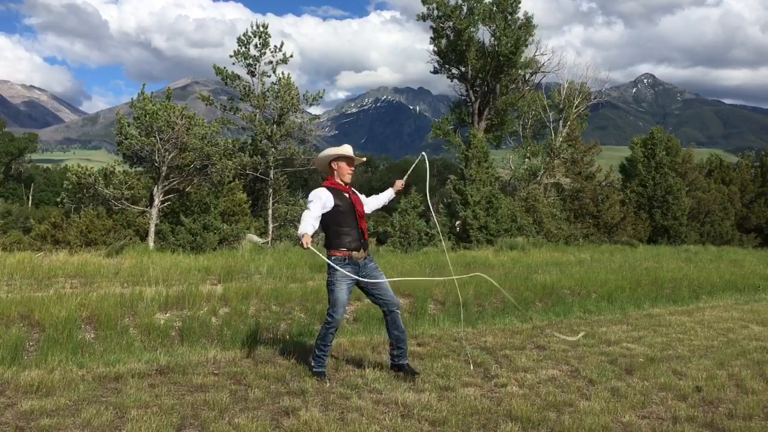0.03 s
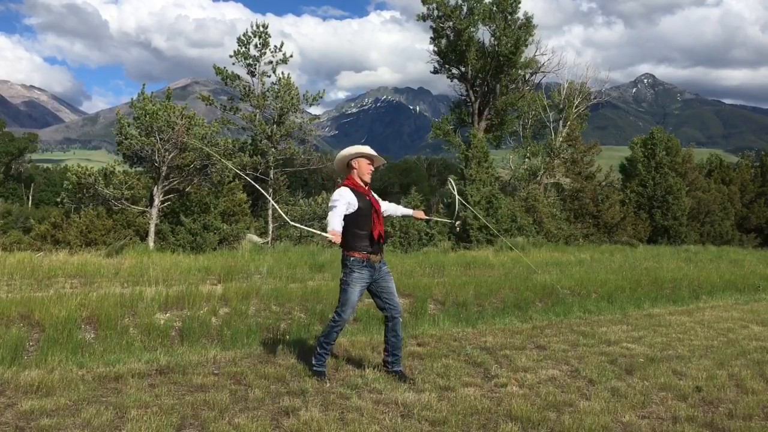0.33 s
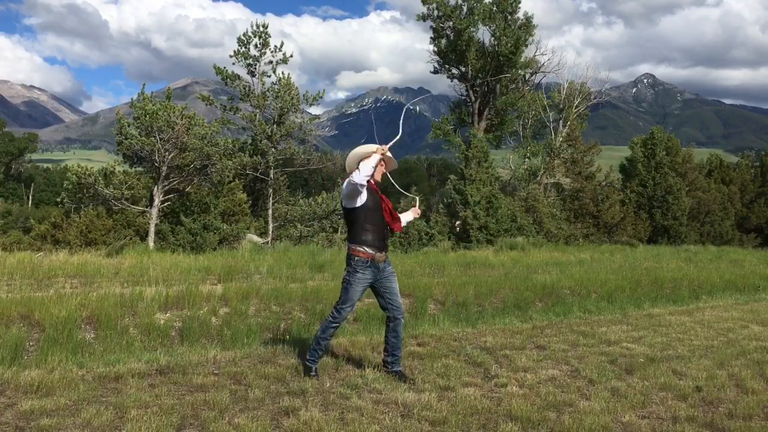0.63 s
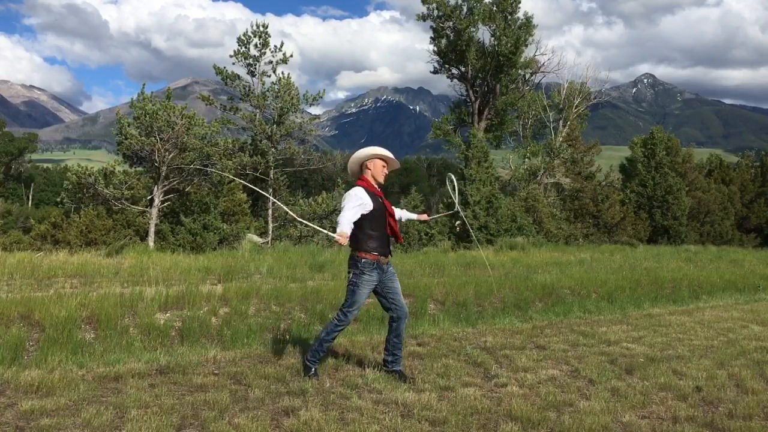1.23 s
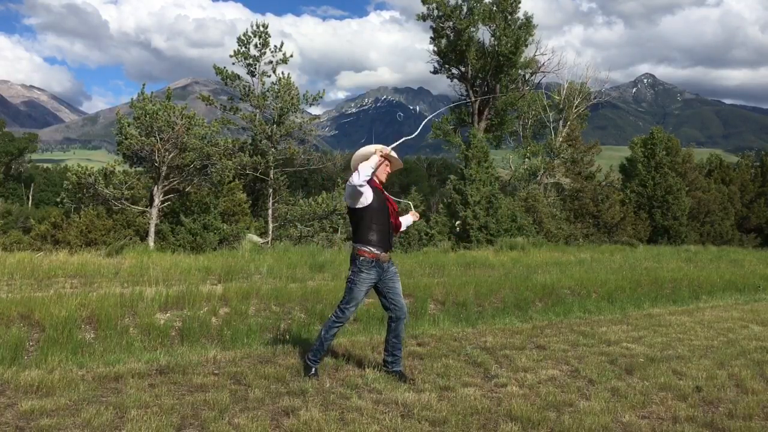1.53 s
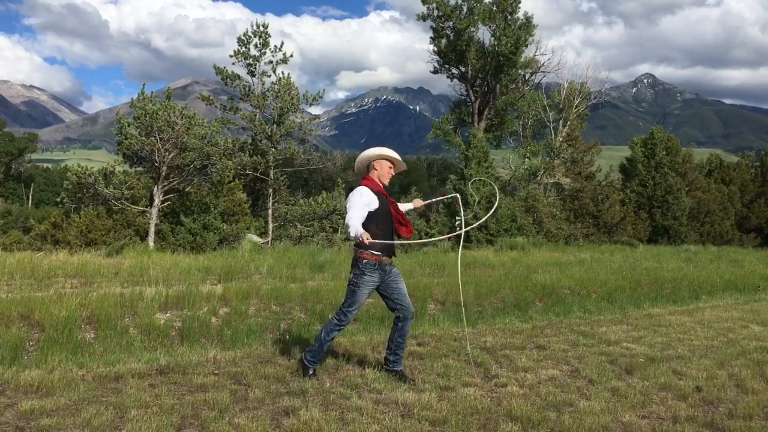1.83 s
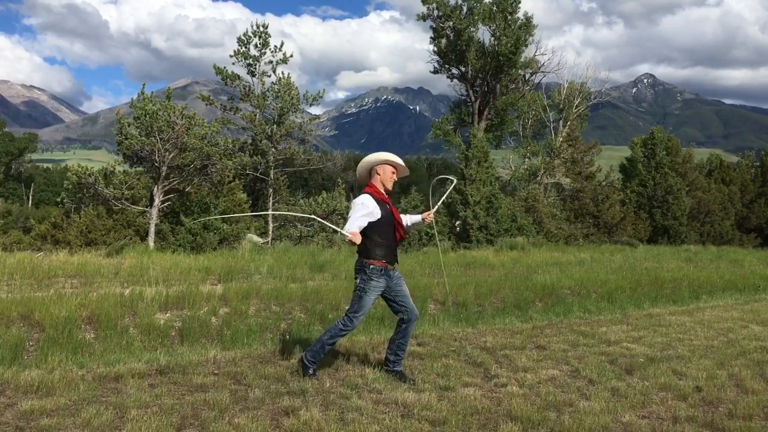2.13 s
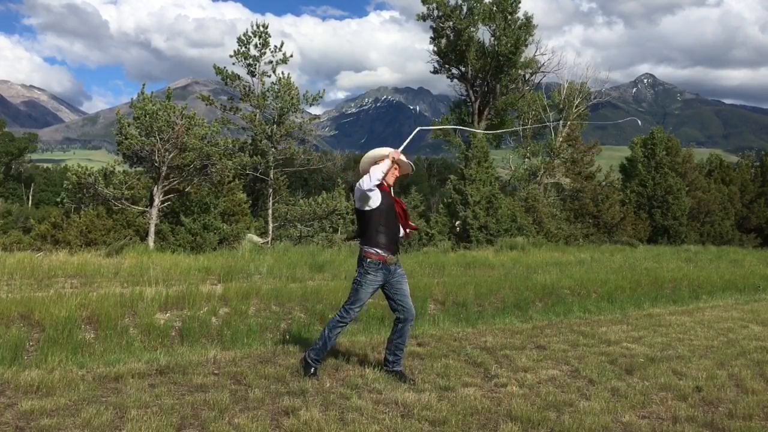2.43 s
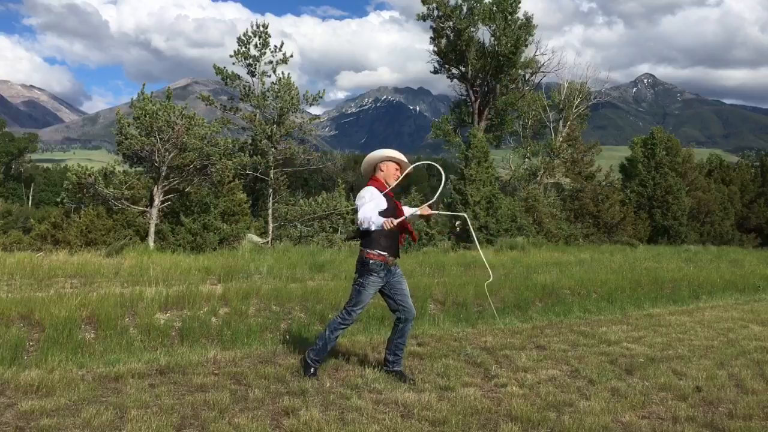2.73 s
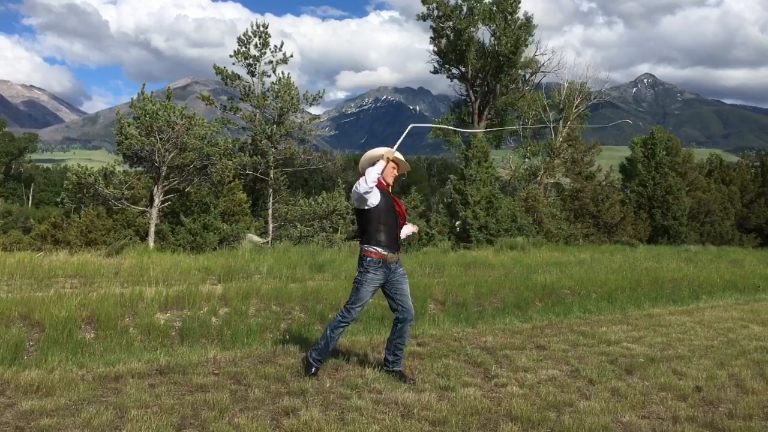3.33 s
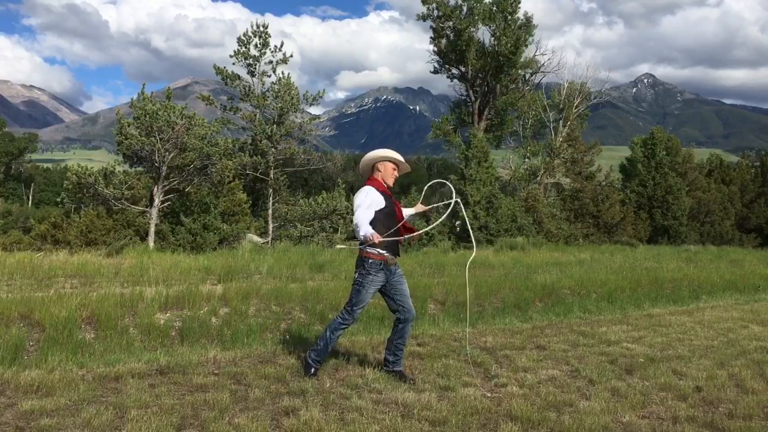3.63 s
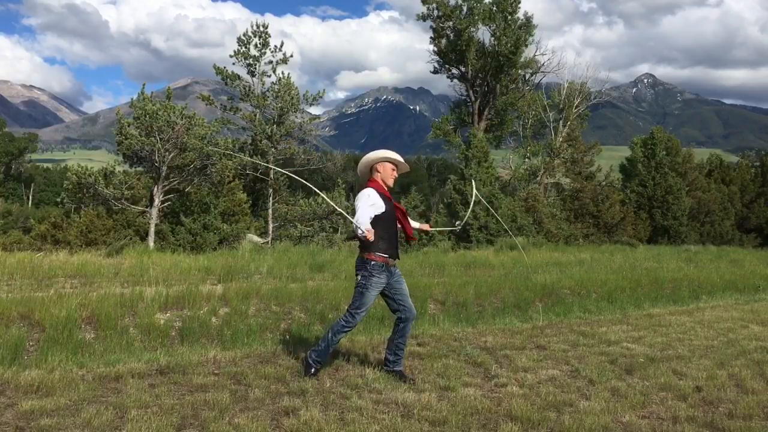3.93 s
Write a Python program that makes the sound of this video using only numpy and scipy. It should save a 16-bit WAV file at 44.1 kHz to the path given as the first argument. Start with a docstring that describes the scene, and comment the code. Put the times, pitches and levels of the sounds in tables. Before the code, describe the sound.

Rapid cracks from two whips, with light swishes and a faint outdoor echo.

```python
"""An open meadow, one microphone, faint wind throughout. A light tick, a tip hisses, and the first of two
whips cracks: two shock fronts, their bounce off the ground and a spray of small snaps. The grass close by
scatters it back, the field and trees farther off ring on. Swishes and ticks follow between the cracks of a
repeating routine of six kinds of stroke; from 0.6 s on, about once a second, the heaviest overloads
the microphone with a low thump."""
import sys
import numpy as np
from scipy import signal
from scipy.fft import rfft, irfft, next_fast_len
from scipy.io import wavfile
from scipy.ndimage import uniform_filter1d

SR = 44100
rng = np.random.default_rng(int(sys.argv[2]) if len(sys.argv) > 2 else 0)


def master_out(mix):
    """Clip the mix to full scale and print it as 16-bit PCM to the path in sys.argv[1]."""
    frames = np.transpose(np.atleast_2d(mix))
    ceiling = np.clip(frames, -1, 1)
    pcm = np.round(ceiling * 32767).astype(np.int16)
    wavfile.write(sys.argv[1], SR, pcm)


N = 176400
LEAD_SAMPLES = 64


def amp(db):
    return 10 ** (np.asarray(db) / 20)


def unit(x):
    return x / np.sqrt(np.mean(x ** 2) + 1e-20)


def add(mix, s, sound):
    """Mixes a sound in at s seconds."""
    at = round(s * SR)
    part = mix[max(at, 0):][:len(sound) + min(at, 0)]
    part += sound[max(-at, 0):][:len(part)]


def colour(x, points):
    """Causal filter through (f/Hz, level/dB) points."""
    size = 2 * next_fast_len(len(x))
    hz, db = np.transpose(points)
    bin_hz = abs(np.fft.fftfreq(size, 1 / SR))
    log_gain = np.log(amp(np.interp(np.log(bin_hz + 1), np.log(hz + 1), db)))
    response = np.exp(np.conj(signal.hilbert(log_gain)))[:size // 2 + 1]
    return irfft(rfft(x, size) * response, size)[:len(x)]


def shock(hz, width_ms, cut_hz=516):
    """Spectrum of a pressure spike; the low cut gives it a rebound."""
    tau = width_ms / 1000
    spike = -np.e * tau * SR / (1 + 2j * np.pi * hz * tau) ** 2
    return spike * 1j * hz / (cut_hz + 1j * hz)


def delay(hz, ms):
    return np.exp(-2j * np.pi * hz * ms / 1000)


def pulse(spectrum):
    """A spectrum as a short sound that starts LEAD_SAMPLES in and has soft ends."""
    wave = np.roll(irfft(spectrum), LEAD_SAMPLES)
    soft_ends = signal.windows.tukey(len(wave), 2 * LEAD_SAMPLES / len(wave))
    return wave * soft_ends * np.linspace(1, 0, len(wave)) ** .5


# Spectrum of the wind at the microphone: f/Hz, level/dB
WIND_SPECTRUM = [(15, -32), (25, 0), (87, -0.5), (277, -9.5), (427, -12), (1790, -13), (6380, -26),
                 (14000, -37.5), (16000, -47)]


def wind(level_db=-57.5, swell_db=1.5):
    """Faint wind over the meadow, its level wavering."""
    swell = unit(uniform_filter1d(uniform_filter1d(rng.standard_normal(N), size=5000), size=3000))
    return amp(level_db + swell_db * swell) * unit(colour(rng.standard_normal(N), WIND_SPECTRUM))


# Light ticks: the thongs touching, or a crack returning from the trees: t/s, level/dB
LIGHT_TICKS = [(.044, -24), (.146, -9), (.3502, -22), (.595, -19), (1.2955, -21), (1.42, -23), (1.526, -22),
               (2.0955, -25), (2.435, -22), (3.329, -23), (3.887, -22)]


def ticks(rattle_t60_s=.012, size=2048):
    """Each tick is a small snap with a brief rattle."""
    out, t, hz = np.zeros(N), np.arange(size) / SR, np.fft.rfftfreq(size, 1 / SR)
    snap = shock(hz, width_ms=.035, cut_hz=1500)
    for s, db in LIGHT_TICKS:
        rattle = .4 * rng.standard_normal(size) * np.exp(-np.log(1000) * t / rattle_t60_s)
        blow = (t == 0) + rattle
        add(out, s - LEAD_SAMPLES / SR, amp(db) * pulse(rfft(blow) * snap))
    return out


def tip_hiss(swell_s=.005):
    """The hiss of the tip swells quickly just before each crack."""
    out, before = np.zeros(N), np.arange(4096)[::-1] / SR
    swell = (1 - before / before[0]) / (1 + before / swell_s)
    for s, *_, echo_db in ROUTINE:
        hiss = unit(colour(rng.standard_normal(len(before)), SCATTER_SPECTRUM))
        add(out, s - before[0], amp(-38.5 + echo_db / 2) * hiss * swell)
    return out


def air_push(swell_s=.005, hz=48):
    """A slow swell of pressure at the microphone that ends at the shock."""
    before = np.arange(SR // 10)[::-1] / SR
    return amp(-12) * np.exp(-before / swell_s) * np.cos(2 * np.pi * hz * before)


# Each kind of stroke as it reaches the microphone: first front width/ms, second front width/ms,
# bounce delay/ms, bounce level/dB, spray level/dB, spray delay/ms, spray length/ms (sign ignored),
# snap width/ms, grass scatter level/dB, field echo t60/s, thump level/dB
STROKE_KINDS = { "split": (.02, .026, 2.5, -7, 0, 5.5, 1.0, .014, -15, .55, -45),
                "soft": (0.14, 0.2, 2.5, -3, -2, 4.5, 1.5, 0.15, -9, .8, -46),
                "full": (.045, .045, 2, 0.5, -12, 2.5, 2.5, 0.4, -16, .55, -33),
                "dull": (.03, .08, 2.5, -11, -4, 4.2, 1.5, .09, -21, .32, -47),
                "heavy": (.035, 0.14, 2.5, -13, -6, 1.5, -0.5, .03, -12, .11, 1),
                "dry": (.033, .033, 2.5, -8, -19, 3, 1.5, 0.43, -29, .2, -32), }


def crack(stroke, first_db, second_db, gap_ms, soften_ms=.016, snaps_per_s=7000, size=2048):
    """Two shock fronts, their softened ground bounce and a spray of snaps from the frayed tip."""
    first_ms, second_ms, bounce_ms, bounce_db = STROKE_KINDS[stroke][:4]
    spray_db, spray_at_ms, spray_ms, snap_ms = STROKE_KINDS[stroke][4:8]
    hz, ms = np.fft.rfftfreq(size, 1 / SR), np.arange(size) * 1000 / SR
    first = amp(first_db) * shock(hz, first_ms)
    second = amp(second_db) * shock(hz, second_ms) * delay(hz, gap_ms)
    fronts = first + second
    bounce = amp(bounce_db) * delay(hz, bounce_ms) / (1 + 2j * np.pi * hz * soften_ms / 1000)
    burst = np.exp(-abs((ms - spray_at_ms) / spray_ms))
    thong_ring = .22 * np.exp(-ms / spray_at_ms)
    snaps = rng.standard_normal(size) * (rng.random(size) < snaps_per_s / SR) * (burst + thong_ring)
    spray = unit(pulse(rfft(snaps) * shock(hz, snap_ms)))
    return pulse(fronts * (1 + bounce)) + amp(spray_db) * irfft(fronts).std() * spray


# What grass, field and trees send back; also the colour of the whips' hiss: f/Hz, level/dB
SCATTER_SPECTRUM = [(60, -18), (200, -7), (600, -2), (1500, 1), (3200, 1), (6500, -2.5), (10000, -11),
                    (16000, -17)]


def scatter(t60_s, rise_s, size, loss_db_per_s_khz=5, grain_db=2.5, patch_db=3.2):
    """Grainy backscatter of energy 1 that loses its treble with distance."""
    frames, hz = size // 128 + 1, np.fft.rfftfreq(256, 1 / SR)
    age, t = np.arange(frames)[:, None] * 128 / SR, np.arange(size) / SR
    point_hz, point_db = np.transpose(SCATTER_SPECTRUM)
    db = np.interp(np.log(hz + 1), np.log(point_hz), point_db) - loss_db_per_s_khz * hz / 1000 * age
    db += grain_db * rng.standard_normal((frames, 1))
    patches = uniform_filter1d(rng.standard_normal(db.shape), size=5, axis=0)
    db += patch_db * unit(uniform_filter1d(patches, size=12, axis=1))
    spectra = amp(db) * np.exp(2j * np.pi * rng.random(db.shape))
    envelope = (1 - np.exp(-t / rise_s)) * np.exp(-np.log(1000) * t / t60_s)
    tail = signal.istft(spectra.T, nperseg=256)[1][:size] * envelope
    return tail / np.sqrt(np.sum(tail ** 2))


def thump(end_hz=42.2, extra_hz=169.3, slowing_s=.0054, peak_s=.0083):
    """The overloaded microphone swings a few times, ever more slowly."""
    t = np.arange(SR // 10) / SR
    turns = np.cumsum(end_hz + extra_hz * np.exp(-t / slowing_s)) / SR
    envelope = (t / peak_s * np.exp(1 - t / peak_s)) ** 1.4
    return -np.cos(2 * np.pi * turns) * envelope


# Cracks of both whips: t/s, stroke, first front level/dB, second front level/dB,
# gap between fronts/ms, field echo level/dB
ROUTINE = [ (0.0725, "split", 1, -4, 0.24, -7), (0.162, "soft", -11, -5, 0.72, -3),
           (0.3217, "full", -1, 1, 0.39, -10), (0.5436, "dull", -10, 6, 1.18, -8.5),
           (0.6169, "heavy", 1, 1, 1.47, -6), (0.7802, "dry", -3, 3, 0.42, -25),
           (0.9967, "split", -3, -9, .2, -16), (1.1083, "soft", -13, -16, 0.64, -9),
           (1.2371, "full", -3, -1, 0.57, -10), (1.45, "dull", -11, 6, 0.98, -11.5),
           (1.5487, "heavy", 1, 1, 1.59, -8), (1.6871, "dry", 3, 3, 0.53, -24),
           (1.899, "dull", -14, 2, 1.04, -16), (2.0025, "split", 3, -4, 0.24, -7),
           (2.1427, "full", -7, 3, .33, -14), (2.3519, "dull", -10, 4, 1.37, -11),
           (2.4594, "heavy", 1, 1, 1.6, -8), (2.5915, "dry", 3, 2, 0.56, -25),
           (2.8058, "dull", -13, -1, 1.15, -20.5), (2.9128, "split", -3, -4, 0.36, -9),
           (3.0412, "full", -8, 3, 0.34, -13), (3.2512, "dull", -9, 5, 1.26, -10.5),
           (3.3538, "heavy", 1, 1, 1.62, -8), (3.4895, "dry", 3, 3, 1.214, -28),
           (3.6929, "dull", -4, 0, .06, -18), (3.7909, "split", -2, -4, 0.17, -10),
           (3.911, "heavy", 1, -3, 1.99, -8), ]
# Tone of the direct crack at the microphone: f/Hz, level/dB
DIRECT_TONE = [(100, 1.5), (400, 2.5), (900, 1), (2000, 0.5), (3300, 2), (4700, 0), (6500, 5), (10000, 2.5),
               (16000, 1.5)]


def whips():
    """Every crack with scatter from the near grass, echo from the far field and microphone thump."""
    direct, rest, push = np.zeros(N), np.zeros(N), air_push()
    push_and_thump = np.concatenate([push, thump()])
    for s, stroke, first_db, second_db, gap_ms, echo_db in ROUTINE:
        grass_db, echo_t60_s, thump_db = STROKE_KINDS[stroke][8:]
        snap = crack(stroke, first_db, second_db, gap_ms)
        add(direct, s - LEAD_SAMPLES / SR, snap)
        grass = scatter(t60_s=.055, rise_s=.0014, size=4096)
        add(rest, s, amp(grass_db) * np.linalg.norm(snap) * grass)
        add(rest, s, amp(echo_db + 1) * scatter(echo_t60_s, rise_s=.009, size=20480))
        add(rest, s - len(push) / SR, amp(thump_db) * push_and_thump)
    return colour(direct, DIRECT_TONE) + rest


# Swings of the thongs: top speed t/s, speeding up/s, slowing down/s, top f/Hz, level/dB
THONG_SWINGS = [(.165, .01, .04, 3400, -35), (1.79, .032, .012, 2200, -48), (2.01, .008, .035, 3300, -40),
                (2.448, .015, .012, 2500, -39), (2.692, .028, .016, 1800, -48),
                (2.92, .008, .028, 2900, -38), (3.13, .025, .03, 1650, -49),
                (3.343, 0.023, .015, 2500, -37), (3.797, .008, .026, 3600, -34)]


def swishes(width_hz=260, hiss_db=-10):
    """Eddies behind the thong whistle higher and louder as it speeds up."""
    out, t = np.zeros(N), np.arange(-SR // 7, SR // 7) / SR
    pole = np.exp(-np.pi * width_hz / SR)
    for s, rise_s, fall_s, top_hz, db in THONG_SWINGS:
        speed = 1 / (1 + (t / np.where(t < 0, rise_s, fall_s)) ** 2 / 2)
        real, imag, noise = rng.standard_normal((3, len(t)))
        eddies = signal.lfilter([1], np.poly([pole, pole]), real + 1j * imag)
        turns = np.cumsum(top_hz * speed) / SR
        whistle = unit((eddies * np.exp(2j * np.pi * turns)).real)
        hiss = amp(hiss_db) * unit(colour(noise, SCATTER_SPECTRUM))
        add(out, s + t[0], amp(db) * speed ** 2.2 * (whistle + hiss))
    return out


def scene():
    """Whips and meadow at one microphone."""
    return (whips() + tip_hiss() + ticks() + swishes() + wind())[None]


def record(dry, ceiling=.98, knee=10.4, edge_hz=16300):
    """Peaks are rounded off at the ceiling, then the highest treble is cut."""
    rounded = dry / (1 + abs(dry / ceiling) ** knee) ** (1 / knee)
    lowpass = signal.firwin(101, edge_hz, window=("kaiser", 9), fs=SR)
    return signal.oaconvolve(rounded, lowpass[None], "same")


dry = scene()
out = record(dry)
master_out(out)
```